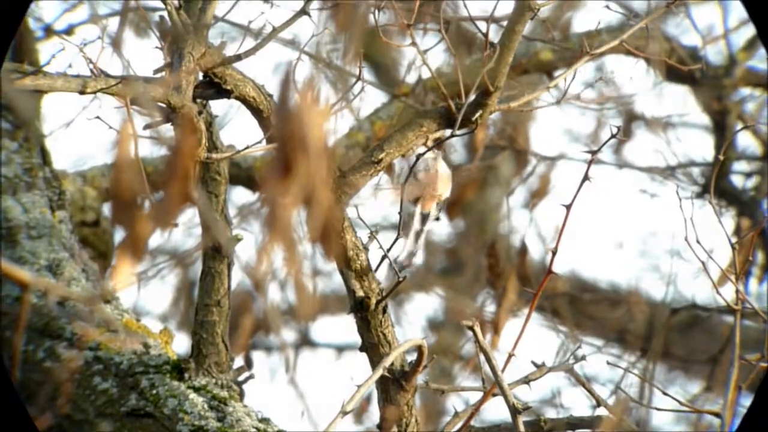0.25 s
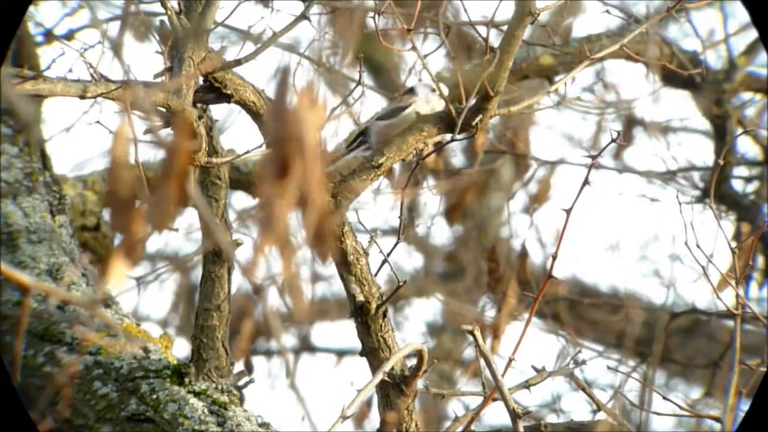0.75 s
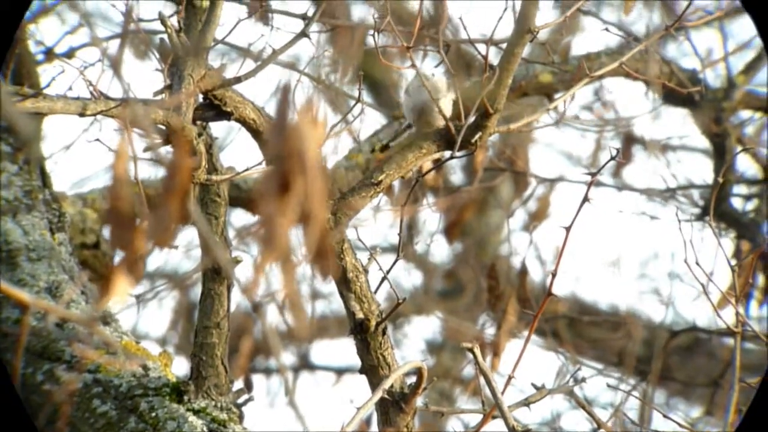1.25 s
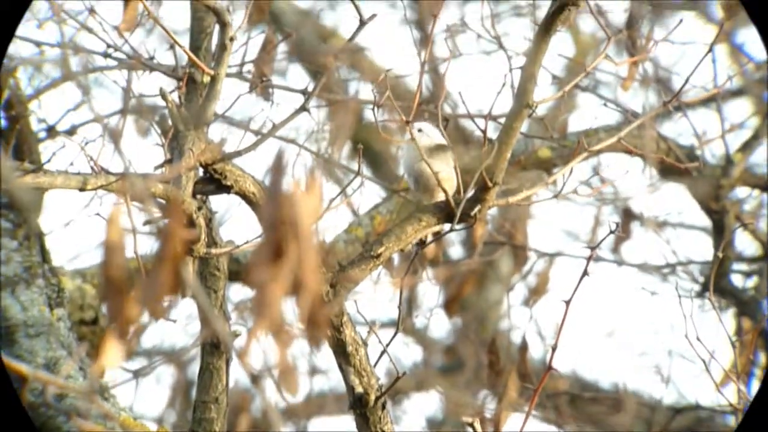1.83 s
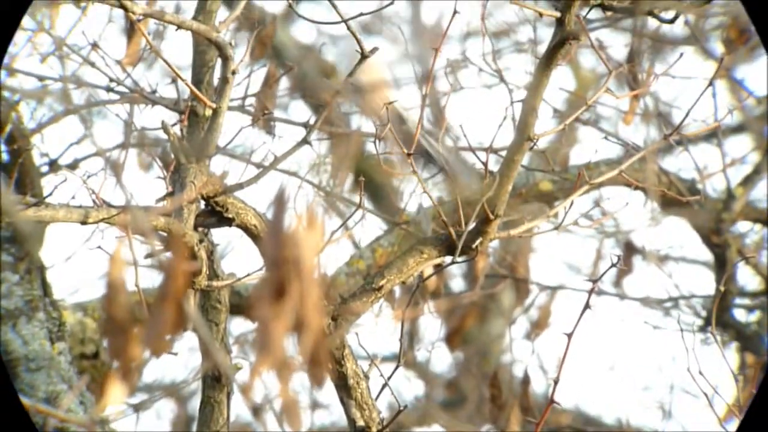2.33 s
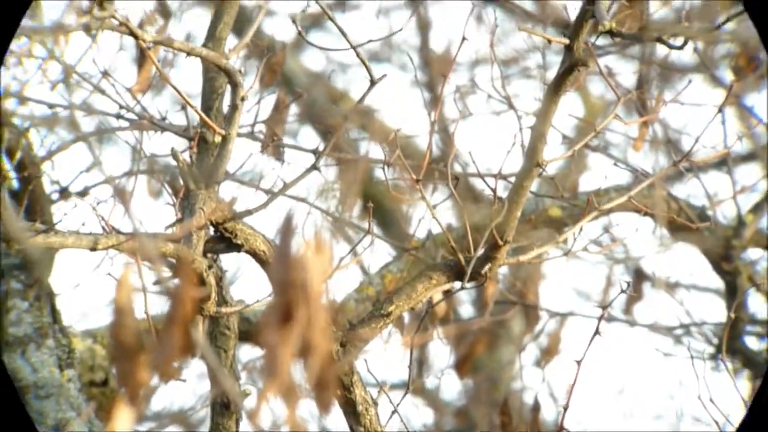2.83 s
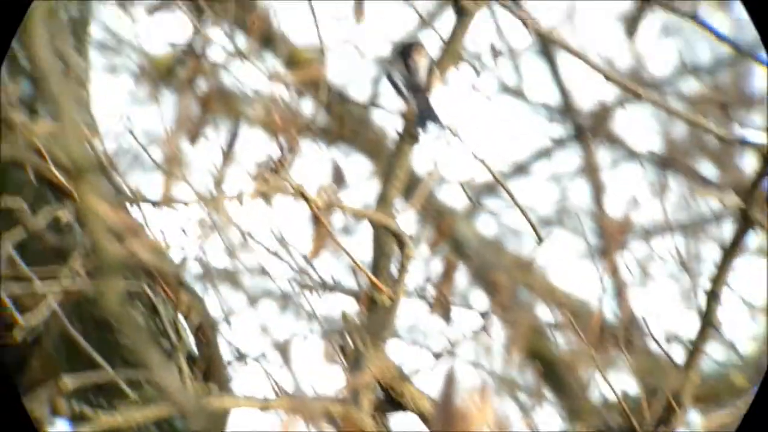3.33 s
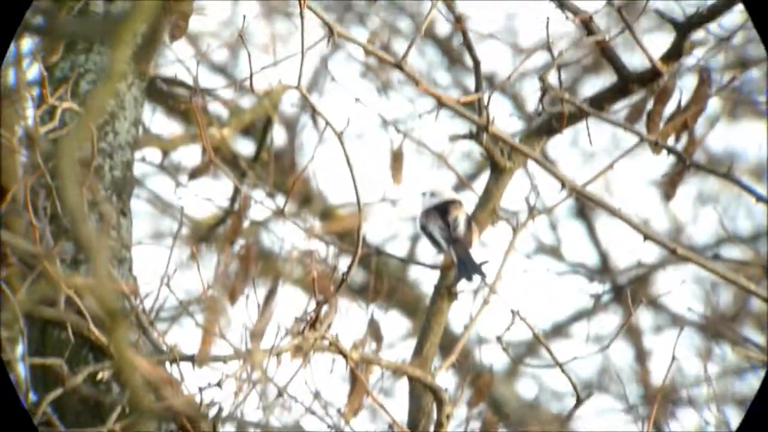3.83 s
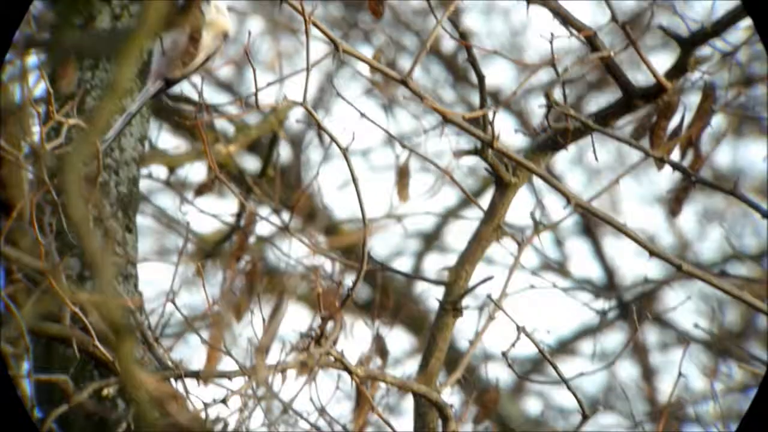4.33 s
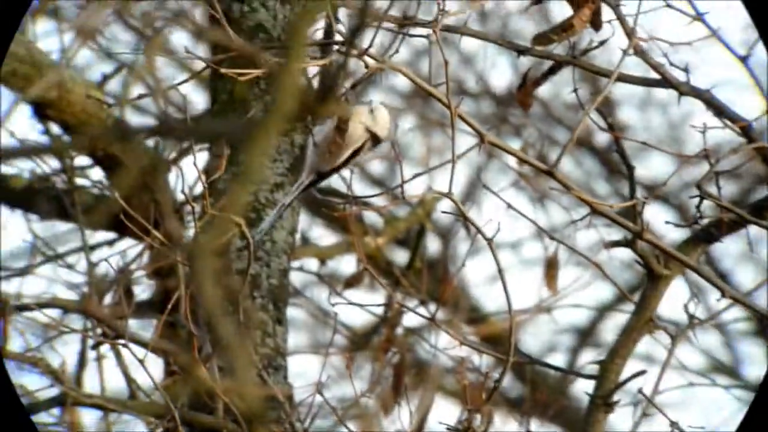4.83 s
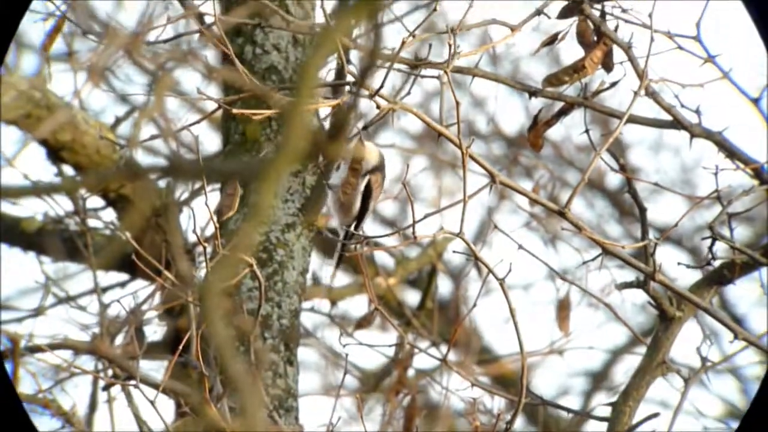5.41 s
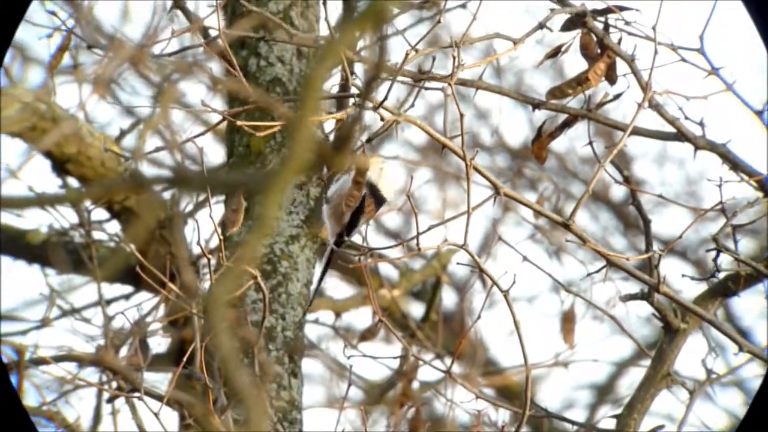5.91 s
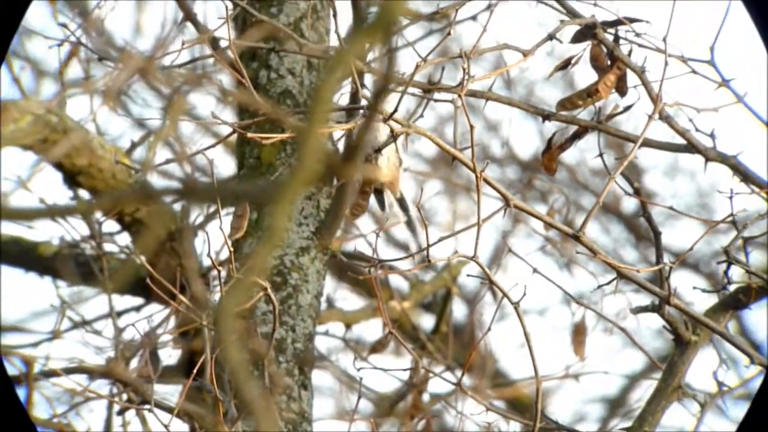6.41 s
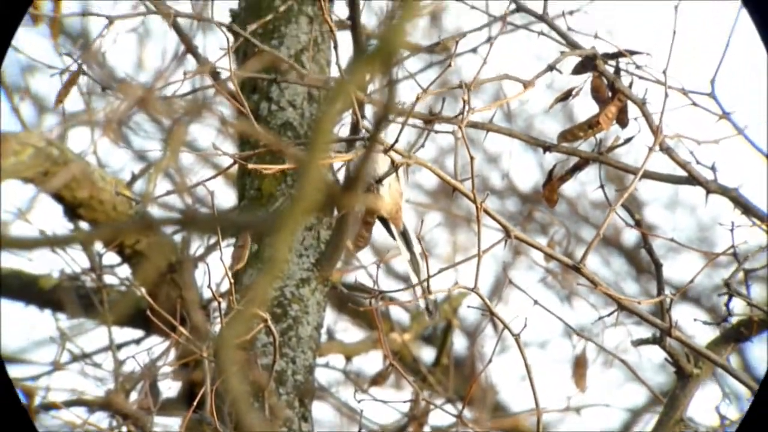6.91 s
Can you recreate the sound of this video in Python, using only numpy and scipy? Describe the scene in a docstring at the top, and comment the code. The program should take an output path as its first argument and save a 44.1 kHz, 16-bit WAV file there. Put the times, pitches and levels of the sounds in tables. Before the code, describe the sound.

A small long-tailed bird among bare branches calls sparsely: brief, high, clear whistles slurring downward, with faint echoes from the trunks. Beneath them lie a steady dull road roar, a wavering low engine hum and fine microphone hiss. Fingers click on the camera's plastic casing at the very start; wind later buffets the microphone softly, once with a low thud. The final whistle is strongest, and a weak, far-off rising note closes the scene.

```python
"""Winter woodland near a road, heard at a small camera amid traffic rumble, tyre roar, light wind and hiss.
An engine drones near 94 Hz throughout, as a sine of drifting pitch; the roar and wind are shaped noise.
At once a bird whistles and the plastic shell ticks under a hand, ringing its modes; a faint peep follows.
Two whistles come from 1.3 s, a gust with a dull thump near 3.4 s, two more whistles, then a weaker gust.
The sixth whistle falls at 5.6 s, a third gust follows, and a faint far tone rises near 7 s."""
import sys
import numpy as np
from scipy import signal
from scipy.fft import rfft, irfft, next_fast_len
from scipy.io import wavfile
from scipy.ndimage import uniform_filter1d, map_coordinates

SR = 44100
rng = np.random.default_rng(int(sys.argv[2]) if len(sys.argv) > 2 else 0)


def wrap_up_sound(samples):
    """Save the sound to the file named by the first command line argument, as 16-bit audio."""
    columns = np.atleast_2d(samples).T
    # keep every value between -1 and 1, then stretch to whole-number steps
    tamed = np.clip(columns, -1, 1)
    steps = np.round(tamed * 32767).astype(np.int16)
    wavfile.write(sys.argv[1], SR, steps)


N = 316549

# Falling whistles and the brief peep: start_s, length_s, first_pitch_hz, last_pitch_hz,
# bend (exponent of the fall, over 1 is faster at the end), peak_rms_db, peak_share (of the length)
WHISTLES = [ (0.135, 0.14, 3120, 2680, 1.2, -54, 0.88), (0.484, 0.021, 3160, 3000, 1.05, -59, 0.45),
            (1.318, 0.146, 3090, 2685, 1.5, -52.5, 0.65), (1.645, 0.15, 2960, 2710, 1.05, -56, 0.52),
            (3.566, 0.12, 3070, 2800, 0.535, -54, 0.48), (3.872, 0.13, 3080, 2700, 1.2, -55, 0.55),
            (5.578, 0.135, 2990, 2580, 2.2, -49.5, 0.63), ]
# Far rising tone: time_s, pitch_hz, rms_db
FAR_TONE = [(6.89, 930, -68), (6.93, 1020, -58), (7.0, 1075, -57.5), (7.065, 1125, -51), (7.105, 1135, -54),
            (7.14, 1130, -66)]
SWELL_DB, SWELL_BEND = 16, 1.38  # rise to the peak of a whistle, quick at first
SAG_DB, CUT_SHARE, CUT_DB = 4, 0.13, 12  # sag after the peak, and the break-off in the last share

# Contacts on the shell: start_s, level_db, brightness_db_per_octave, low_mode_lag_s_per_octave
TICKS = [(0.147, -34.5, 0.5, 0.00055), (0.2006, -32.5, -2.5, 0.00353), (0.225, -39.5, -1, 0.00191),
         (0.2305, -40, -6, 0.00098), (0.312, -33, -0.8, 0.0078)]
# Modes of the plastic shell: pitch_hz, level_db, t60_s
SHELL_MODES = [(1420, -2, 0.026), (2080, -9, 0.031), (2430, -5, 0.02), (2830, -13, 0.019),
               (3300, -8.5, 0.016), (3704, -12.5, 0.012)]

# Gusts at the microphone: peak_s, above_calm_db, rise_s, fall_s
GUSTS = [(3.39, 10.5, 0.11, 0.2), (4.3, 3.5, 0.2, 0.3), (5.95, 7.5, 0.18, 0.3)]
# Dull thump at the head of the strongest gust: start_s, level_db, first_pitch_hz, t60_s
THUMP = (3.366, -31.5, 118, 0.12)

# Engine drone: time_s, rms_db
DRONE = [(0.08, -62), (0.22, -43.5), (0.32, -53), (1.86, -57), (2.3, -47.5), (2.46, -57), (3.04, -51),
         (4.84, -55), (5.7, -65), (5.9, -54), (6.28, -67), (6.74, -52.5), (7.18, -62)]
DRONE_HZ, DRONE_DRIFT_HZ = 94.4, 1.612  # engine note and its slow drift

# Bands in which the rms of wind, rumble and tyres is set: low_hz, high_hz
AIR_BANDS = [(22, 55), (105, 300), (500, 2200)]
WIND_DB, RUMBLE_DB, TYRES_DB = -64.5, -52, -51.5  # rms in those bands, the wind when calm
# Spectral shapes of wind on the microphone, engine rumble and tyre roar: frequency_hz, relative_db
WIND_SPECTRUM = [(10, -25), (24, -9.5), (45, -1.5), (80, -1.5), (130, -2.5), (200, -15.5), (400, -63.5)]
RUMBLE_SPECTRUM = [(20, -38), (42, -15), (60, -3.5), (82, 1), (105, -4), (130, -2), (210, -6), (400, -12.5),
                   (800, -30), (2000, -62)]
TYRE_SPECTRUM = [(150, -28.5), (400, -4), (700, -1.5), (1100, 0), (1500, -4.5), (2300, -11), (3000, -12.5),
                 (3500, -18.5), (4200, -32.5), (8000, -57.5)]

# Thin steady tones of the electronics: pitch_hz, rms_db
WHINE = [(4388, -86.5), (6222, -91), (6666, -89.5)]
# Roll-off of the converter: frequency_hz, gain_db
CONVERTER = [(6900, 0), (7400, -0.5), (7700, -5), (7950, -13.5), (8150, -21.5), (8270, -32.5)]
TOP_HZ = 8280  # nothing but the offset passes unless below this


def birds():
    """Direct sound and reflection: notes arrive first, then faint echoes scattered from the trunks."""
    near = sum(note(whistle(*row), fade=.006, waver_hz=12, flutter_db=1.3) for row in WHISTLES)
    far = note(FAR_TONE, fade=.01, waver_hz=38, flutter_db=3)  # blurred by distance
    sent_to_trunks = amp(-15) * near + amp(-10) * far
    return near + far + echoes(sent_to_trunks, t60=.22, gap=.006)


def whistle(start, length, first_hz, last_hz, bend, peak_db, peak_share):
    """Pitch glide and envelope: the pitch falls as the level swells, sags and breaks off."""
    u = np.linspace(0, 1, num=41)
    peak_share = np.clip(peak_share, .1, .85)
    swell = SWELL_DB * np.clip(1 - u / peak_share, 0, 1) ** SWELL_BEND
    sag = SAG_DB * np.clip((u - peak_share) / (1 - peak_share), 0, 1)
    cut = CUT_DB * np.clip(1 - (1 - u) / CUT_SHARE, 0, 1)
    hz = first_hz + (last_hz - first_hz) * u ** bend
    return np.transpose([start + length * u, hz, peak_db - swell - sag - cut])


def note(rows, fade, waver_hz, flutter_db):
    """Propagation through moving air: the pitch and level of a tone waver on the way."""
    hz, db = curves(rows)
    t = np.arange(N) / SR
    first_s, last_s = rows[0][0], rows[-1][0]
    gate = np.clip(np.minimum(t - first_s, last_s - t) / fade, 0, 1)
    return gate * tone(hz + waver_hz * wobble(60), db + flutter_db * wobble(70))


def echoes(x, t60, gap):
    """Diffuse reflection: scattered returns begin after a gap and decay exponentially."""
    t = np.arange(SR // 2) / SR
    tail = rng.standard_normal(len(t)) * amp(-60 * t / t60) * (t > gap)
    return signal.fftconvolve(x, tail / np.linalg.norm(tail))[:N]


def shell():
    """Modal vibration and dispersion: contacts ring modes; high bending waves run faster and arrive first."""
    ringing = np.zeros(N + SR)
    t = np.arange(SR // 8) / SR
    top_hz = SHELL_MODES[-1][0]
    for start, tick_db, bright_db, lag in TICKS:
        lag = max(lag, 0)
        onset = .0005 + .18 * lag  # a farther contact is more drawn out
        for hz, mode_db, t60 in SHELL_MODES:
            delay = lag * (np.log2(top_hz / hz) + 0.26 * rng.random())
            u = np.clip(t - delay, 0, 1)
            rise = 1 - np.exp(-(u / onset) ** 2)
            level_db = tick_db + mode_db + bright_db * np.log2(hz / 2000) + rng.normal(0, 1.4)
            decay = amp(level_db - 60 * u / t60)
            mode_hz = hz * (1 + rng.normal(0, 0.015))
            ringing[round(start * SR):][:len(t)] += decay * rise * np.sin(2 * np.pi * mode_hz * u)
    direct = ringing[:N]
    rattle = amp(-8) * echoes(direct, t60=0.11, gap=0.0034)  # loose parts inside shake on raggedly
    return direct + rattle


def thump():
    """Damped oscillation: one low push swings a few times, sinking in pitch."""
    start, db, hz, t60 = THUMP
    u = np.clip(np.arange(N) / SR - start, 0, 1)
    onset = 1 - np.exp(-u / 0.004)
    sinking = 1 - 2.3 * np.minimum(u, .1)
    return amp(db - 60 * u / t60) * onset * np.sin(2 * np.pi * hz * u * sinking)


def engine_drone():
    """Periodic source: a distant engine sounds one sine that wanders in pitch and level."""
    drone_db, = curves(DRONE)
    hz = DRONE_HZ + DRONE_DRIFT_HZ * wobble(1.1) + 1.5 * wobble(6)
    return tone(hz, drone_db + 2.2 * wobble(6.2))


def traffic():
    """Broadband radiation: distant engines rumble low and tyres roar higher, as two shaped noises."""
    _, rumble_band, tyre_band = AIR_BANDS
    rumble = amp(RUMBLE_DB + 0.63 * wobble(4)) * rush(RUMBLE_SPECTRUM, rumble_band, patchy_db=0.78)
    tyres = amp(TYRES_DB + 0.22 * wobble(4)) * rush(TYRE_SPECTRUM, tyre_band, patchy_db=0.54)
    return rumble + tyres


def wind():
    """Turbulent pressure: wind pushes on the microphone as low noise that gusts make louder."""
    wind_band, _, _ = AIR_BANDS
    level = amp(WIND_DB + gusts() + 2.6 * wobble(4))
    return level * rush(WIND_SPECTRUM, wind_band, patchy_db=1.3)


def gusts():
    """Transient flow: each gust adds a bell-shaped rise in dB, with its own rise and fall times."""
    t = np.arange(N) / SR
    return sum(db * np.exp(-((t - s) / np.where(t < s, rise, fall)) ** 2) for s, db, rise, fall in GUSTS)


def rush(spectrum, band, patchy_db):
    """Spectral shaping: noise patchy in time and frequency is coloured, then set to rms 1 in its band."""
    z = signal.stft(rng.standard_normal(N + 1024), nperseg=1024)[2]
    patches = uniform_filter1d(rng.standard_normal(z.shape), 8, 0)
    patches = uniform_filter1d(patches, 8, 1)
    noise = signal.istft(z * amp(patchy_db * unit(patches)), nperseg=1024)[1][:N]
    noise = filtered(noise, lambda hz: amp(along(spectrum, hz)))
    in_band = filtered(noise, lambda hz: (hz > band[0]) & (hz < band[1]))
    return noise / np.std(in_band)


def tone(hz, db):
    """Phase accumulation: a sine follows a pitch curve and an rms level."""
    cycles = np.cumsum(hz) / SR + rng.random()
    return np.sqrt(2) * amp(db) * np.sin(2 * np.pi * cycles)


def wobble(rate):
    """Slow fluctuation: a smooth curve through random knots, rate of them a second."""
    knots = rng.standard_normal(int(N * rate / SR) + 4)
    return map_coordinates(knots, [np.arange(N) * rate / SR])


def curves(rows):
    """Linear interpolation: one value per sample for each column after the time."""
    s, *cols = np.transpose(rows)
    return [np.interp(np.arange(N) / SR, s, c) for c in cols]


def along(points, hz):
    """Logarithmic frequency scale: (Hz, value) points are interpolated on a log axis."""
    f, v = np.transpose(points)
    return np.interp(np.log(hz + 1), np.log(f + 1), v)


def filtered(x, response):
    """Linear filtering: the spectrum of x is multiplied by a response of frequency."""
    m = next_fast_len(N + SR // 2)
    spectrum = rfft(x, m) * response(np.fft.rfftfreq(m, 1 / SR))
    return irfft(spectrum, m)[..., :N]


def amp(db):
    """Decibel scale: the amplitude gain of a level in dB."""
    return 10 ** (np.asarray(db) / 20)


def unit(x):
    """Normalisation: x at rms 1."""
    return x / np.sqrt(np.mean(x ** 2) + 1e-20)


def scene():
    """Superposition: the pressures of all sources add at one microphone."""
    return (birds() + shell() + thump() + engine_drone() + traffic() + wind())[None]


def record(dry):
    """Electronic noise and band limiting: hiss, thin tones and an offset join; the top rolls off."""
    hiss = amp(-59.5) * rng.standard_normal(N)
    whine = sum(tone(np.full(N, float(hz)), db) for hz, db in WHINE)
    offset = -.0072  # constant, of full scale
    rolled = filtered(dry + hiss + whine, lambda hz: amp(along(CONVERTER, hz)))
    return offset + filtered(rolled, lambda hz: hz < TOP_HZ)


dry = scene()
out = record(dry)
wrap_up_sound(out)
```